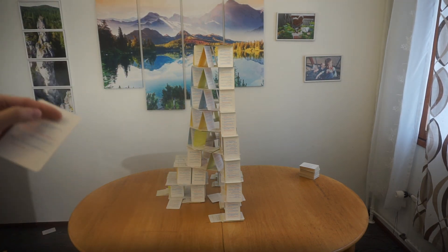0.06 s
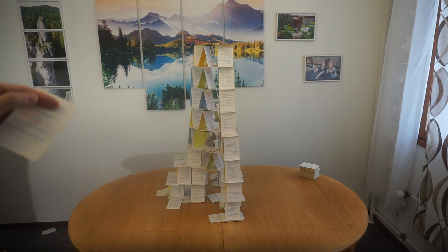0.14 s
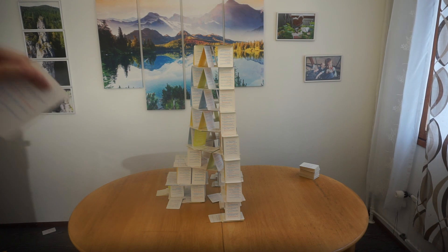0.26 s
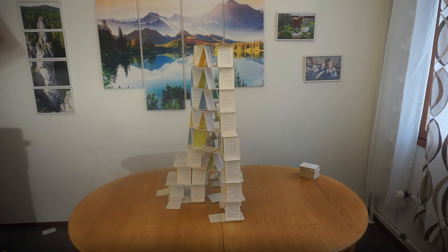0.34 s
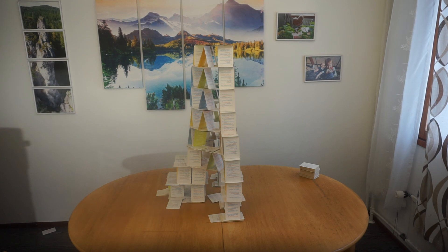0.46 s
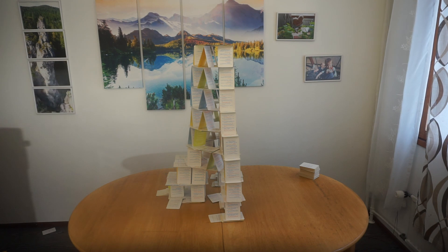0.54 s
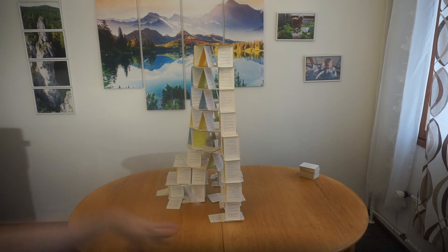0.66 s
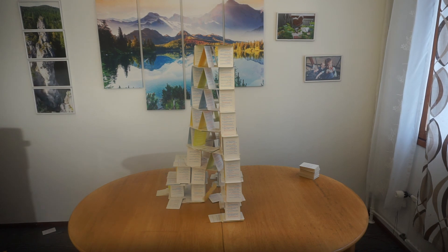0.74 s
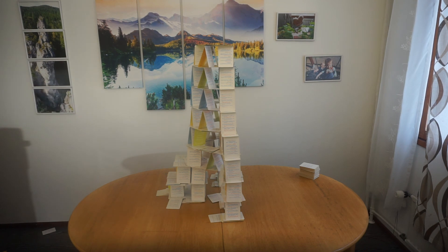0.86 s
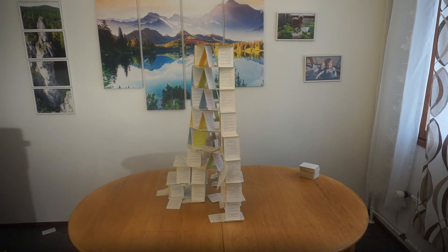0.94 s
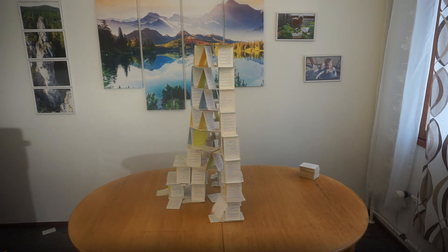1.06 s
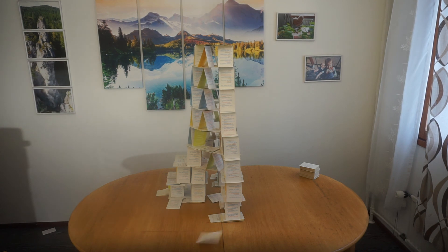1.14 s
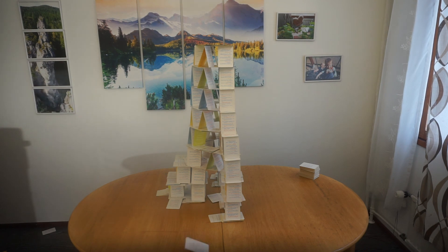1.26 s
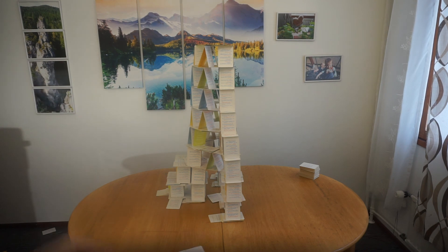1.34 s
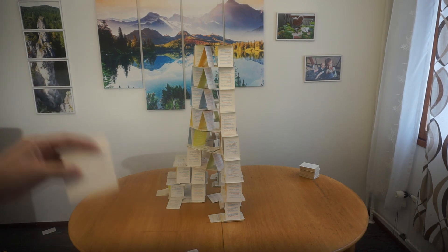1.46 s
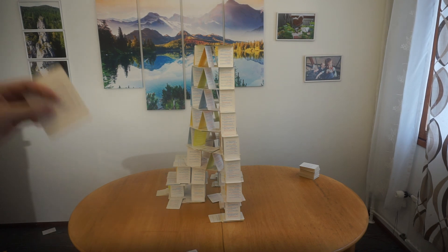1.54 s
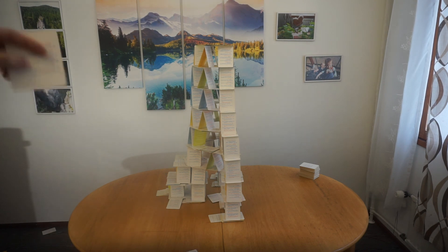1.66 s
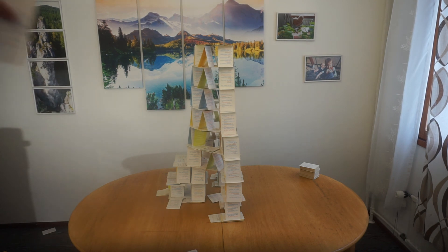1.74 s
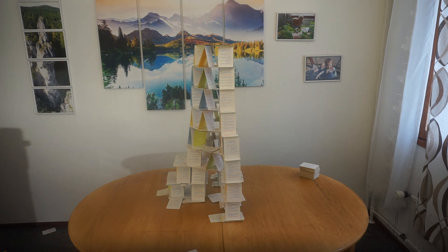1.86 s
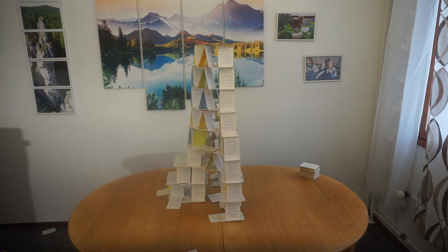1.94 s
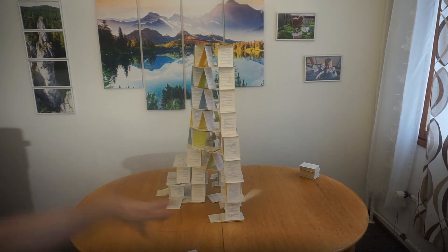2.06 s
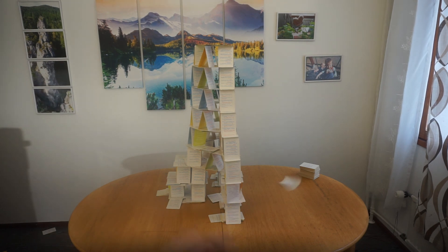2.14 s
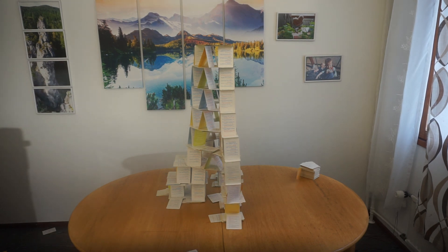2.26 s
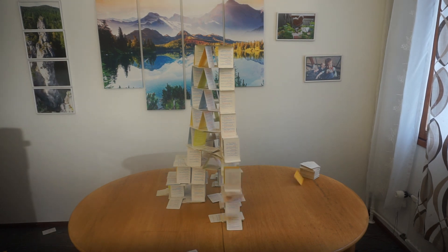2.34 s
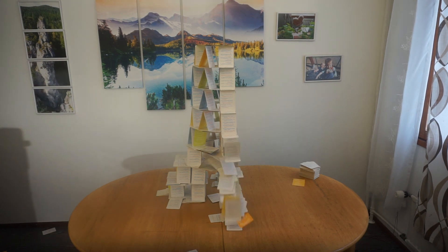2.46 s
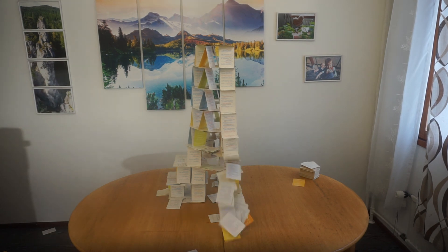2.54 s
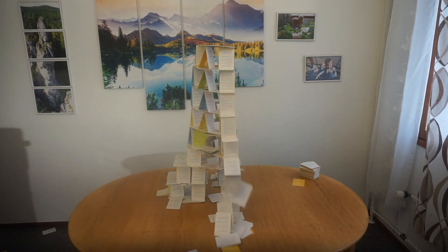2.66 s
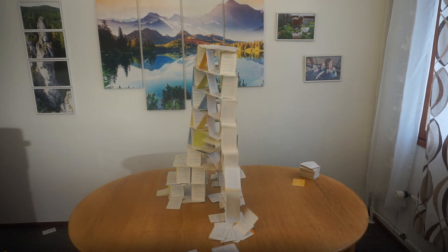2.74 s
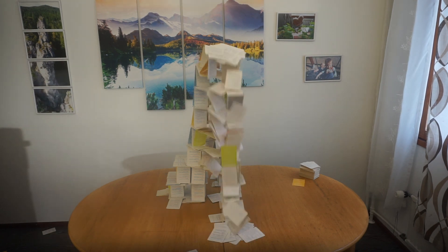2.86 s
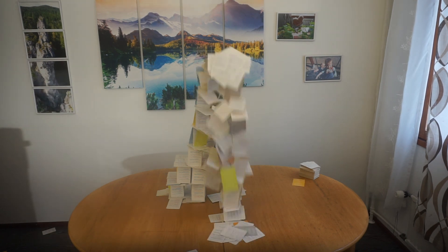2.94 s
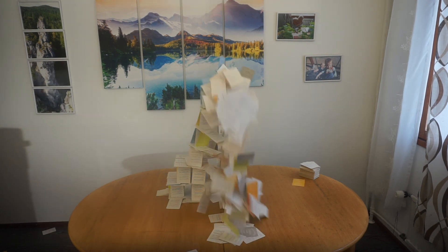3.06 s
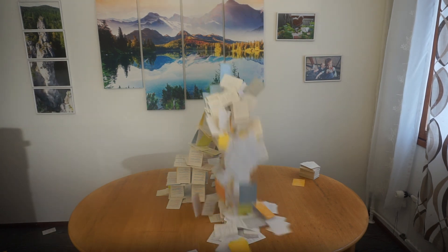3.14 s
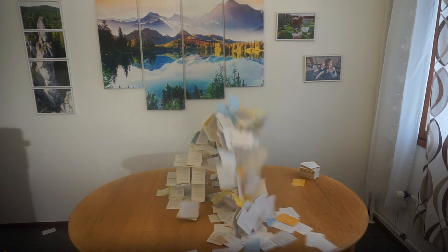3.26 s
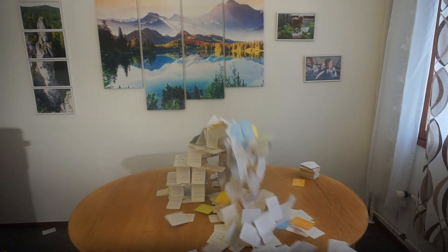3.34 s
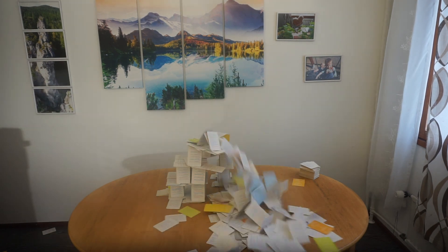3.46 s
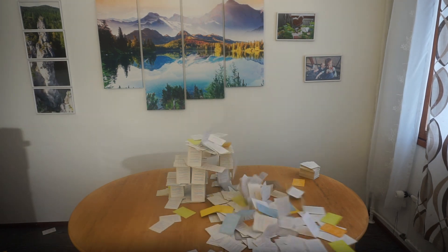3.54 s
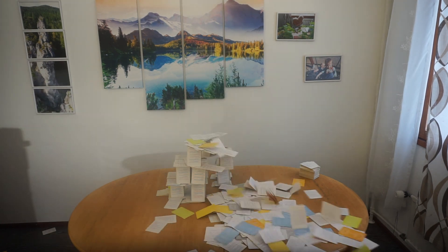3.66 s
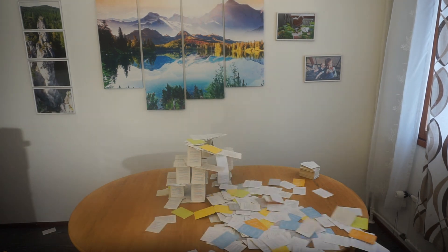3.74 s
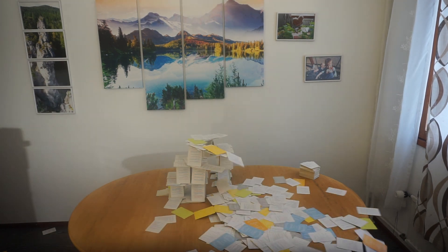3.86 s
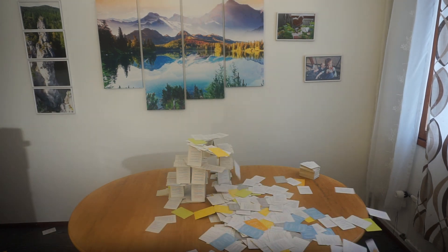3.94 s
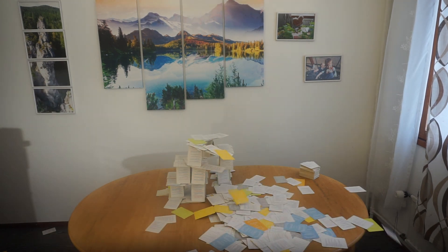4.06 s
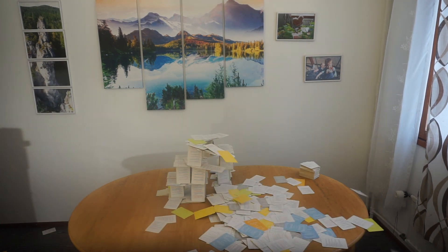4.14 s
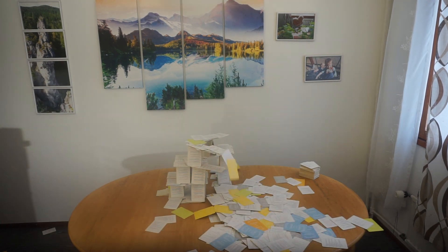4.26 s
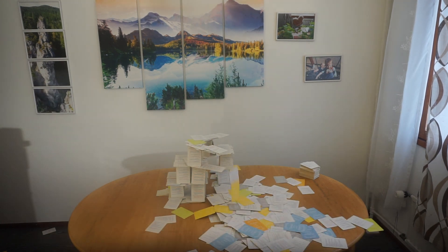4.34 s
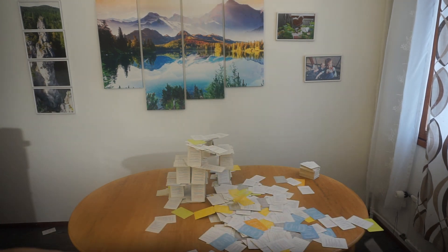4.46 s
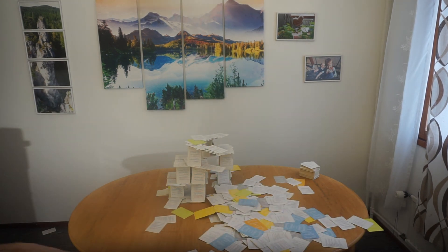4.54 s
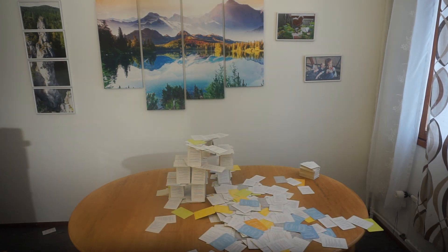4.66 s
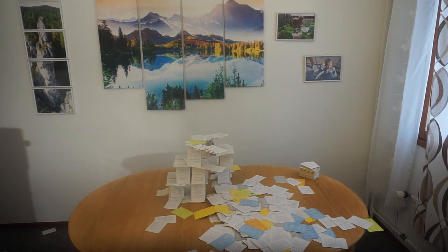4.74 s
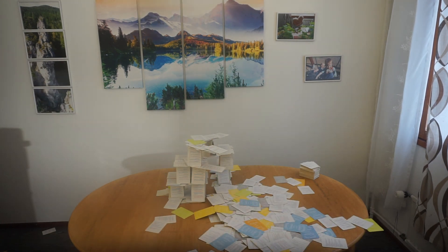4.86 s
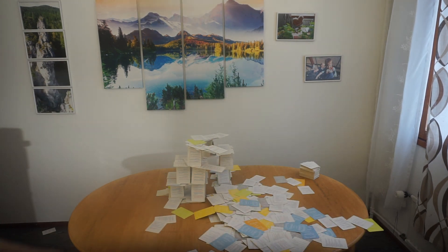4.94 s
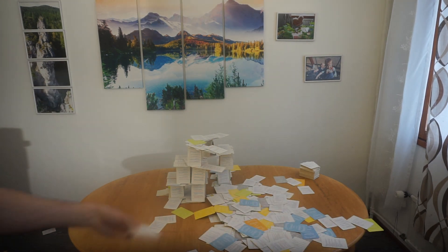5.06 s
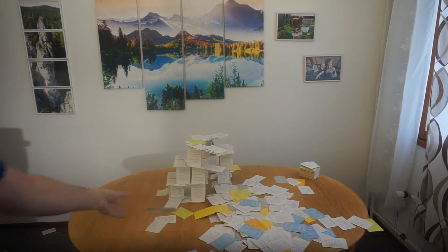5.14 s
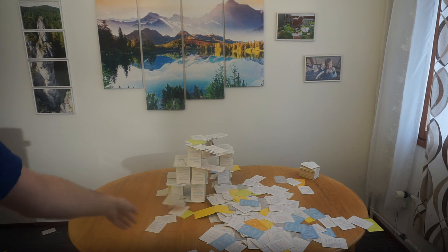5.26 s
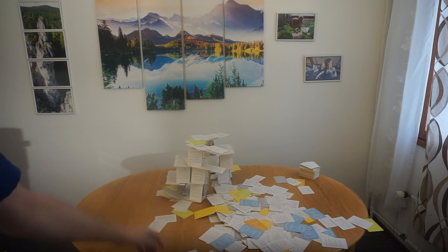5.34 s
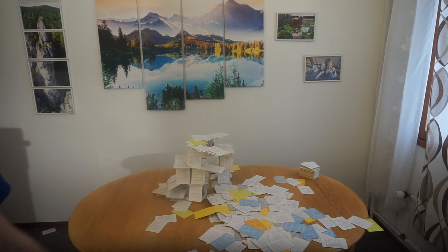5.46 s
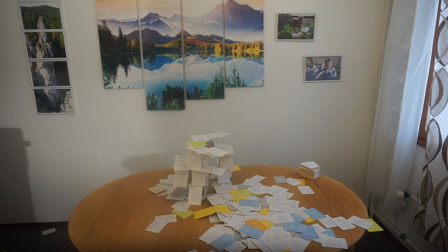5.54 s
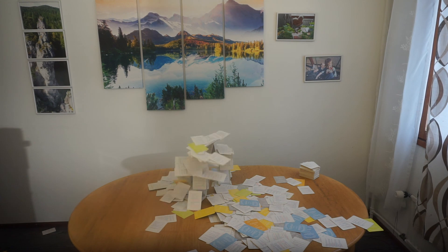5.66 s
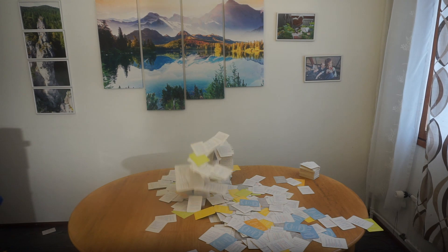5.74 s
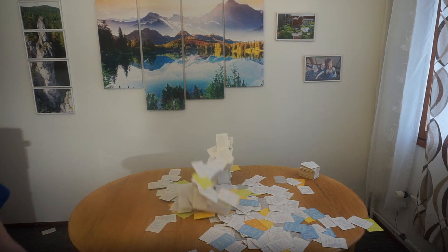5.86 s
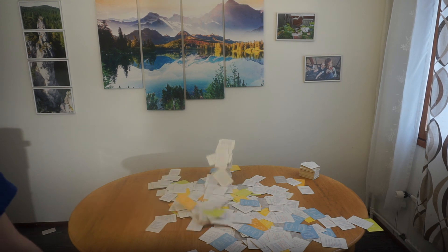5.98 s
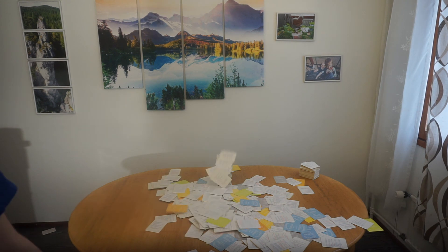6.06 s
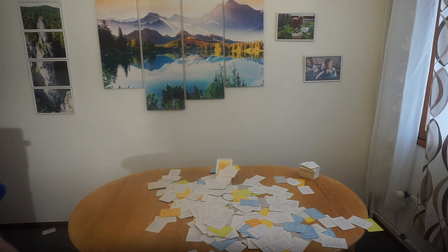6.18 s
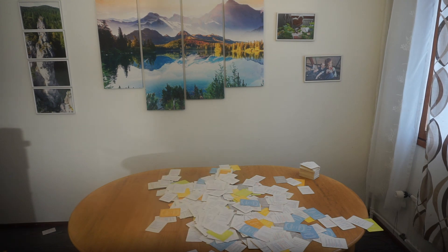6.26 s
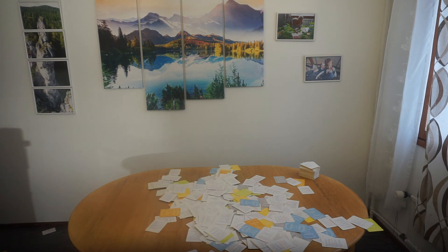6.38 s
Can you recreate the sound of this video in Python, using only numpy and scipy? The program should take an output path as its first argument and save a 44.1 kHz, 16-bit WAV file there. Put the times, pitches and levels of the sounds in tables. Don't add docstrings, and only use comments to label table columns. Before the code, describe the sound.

In a bare, lively room, thrown cards smack hard, a card tower cascades onto table and floor, and a smaller second collapse follows.

```python
import sys
import numpy as np
from scipy import signal
from scipy.fft import rfft, irfft, next_fast_len
from scipy.io import wavfile
from scipy.ndimage import uniform_filter1d, map_coordinates

SR = 44100
rng = np.random.default_rng(int(sys.argv[2]) if len(sys.argv) > 2 else 0)


def bounce(signal):
    frames = np.transpose(np.atleast_2d(signal))
    limited = np.clip(frames, -1, 1)
    pcm = np.round(limited * 32767).astype(np.int16)
    wavfile.write(sys.argv[1], SR, pcm)


def volts(x):
    e = np.asarray(x, float) / 20
    return 10 ** e


N = 282681
TAIL = 24000
GRID_HZ = np.fft.rfftfreq(1024, 1 / SR)

# (time [s], level [dB])
QUIET_LEVEL = [(0, -56), (.55, -57), (1.8, -59.5), (4.8, -66), (5.0, -65), (5.19, -67), (5.22, -69),
               (5.3, -63), (6.41, -54)]
# (frequency [Hz], density [dB per Hz])
HISS_SPECTRUM = [(150, -27), (250, -7.5), (700, -9), (1150, -5.5), (1800, -14), (2400, -9), (3300, -20),
                 (7500, -23), (9300, -21), (11500, -25.5)]
# (frequency [Hz], density [dB per Hz])
RUMBLE_SPECTRUM = [(15, -17), (30, 5), (50, -6), (100, 2.5), (200, -2.5), (400, -15.5)]
# (centre [Hz], width [Hz], level [dB])
WHINE_BANDS = [(838.5, 19, -6.5), (2760, 40, -19)]
# (frequency [Hz], likeness [0-1])
HISS_LIKENESS = [(60, 0.82), (130, 0.29), (270, 0.11), (600, 0.014)]
# (frequency [Hz], likeness [0-1])
ROOM_LIKENESS = [(60, 0.98), (140, 0.97), (350, 0.95), (830, 0.76), (2010, 0.53), (4830, 0.08), (11600, 0)]
# (frequency [Hz], t60 [s])
ROOM_T60 = [(150, 0.77), (400, 0.37), (1000, 0.5), (2800, 0.41), (7300, 0.3), (11000, 0.27)]
# (frequency [Hz], difference [dB])
PORT_TILT = [(60, 1), (170, -0.5), (490, 0.5), (1410, -0.5), (4050, 1.0), (11600, 6)]

# (time [s], level [dB], half length [s])
ARM_SWINGS = [
    (0.626, -44, 0.04),
    (2.04, -49, 0.067),
    (5.5, -57, 0.23),
]
# (time [s], peak [dB], flat thud [dB], ring [Hz])
FINGER_RUBS = [
    (0.607, -31, -8, 4900),
    (0.614, -20.5, -17, 4470),
    (1.548, -49.5, -19, 8240),
    (1.63, -53, -11, 8580),
    (1.7, -51, -14, 8200),
    (2.0024, -31.5, -12.5, 8700),
    (2.037, -43.5, 2, 4570),
    (5.265, -25.5, -11, 3060),
]
# (start [s], length [s], level [dB], flat thud [dB], edge tick [dB])
TABLE_SLIDES = [(0.61, .02, -42, 8, 8), (0.695, 0.074, -13, -5, -13), (1.03, 0.026, -38, -6, -16),
                (1.17, 0.076, -39, -2, 6), (1.3, 0.12, -53.5, -1, 11), (2.095, 0.14, -21.5, -2.5, -3.5),
                (2.3, .17, -35, -3, -8), (2.535, 0.067, -23, -6, 7), (2.62, 0.15, -22.5, -4.5, 0.5),
                (2.79, 0.22, -21, -6.5, 2.5), (2.96, 0.16, -16.5, -5.5, 0.5), (3.099, 0.17, -16, -5, 0.5),
                (3.25, 0.25, -17, -4.5, 1.5), (3.47, 0.18, -21.5, -3.5, 3.5), (3.7, 0.19, -24, -6, 1),
                (3.95, 0.33, -25.5, -1.5, 4), (5.302, 0.11, -30, 0, -1.5), (5.428, 0.23, -29, -8, -1.5),
                (5.667, 0.093, -32.5, -0.5, 4.5), (5.76, .12, -27.5, -2.5, 2),
                (5.878, 0.16, -18, -6.5, 0.5), (6.063, 0.14, -24.5, -8, -1.5),
                (6.177, 0.068, -23, -9.5, -3.5)]
# (start [s], length [s], level [dB], flat thud [dB], edge tick [dB])
FLOOR_SLIDES = [
    (4.15, .05, -24.5, -21, 8),
    (4.19, 0.13, -18, -11.5, 3),
    (4.35, 0.12, -25, -2, 0),
    (4.49, .06, -32, -6, -4),
    (4.595, 0.028, -35, 7, 2.5),
    (4.75, 0.05, -44, 15.5, -1.5),
]
# (time [s], peak [dB], flat thud [dB], ring [Hz])
TABLE_SLAPS = [(0.6905, -6, -15.5, 2500), (1.033, -35, -9.5, 1210), (1.384, -37.5, -23, 2610),
               (2.0897, -6.5, -25, 2220), (2.312, -42, -25, 2340), (2.38, -22, -20, 2430),
               (2.5282, -8.5, -21.5, 1800), (5.2787, -14.5, -11, 2760), (5.4264, -28, -19, 2310),
               (5.6704, -17, -26, 1900), (5.781, -15.5, -8.5, 1510), (6.088, -26, -16, 2320)]
# (time [s], peak [dB], flat thud [dB], ring [Hz])
EDGE_FLICKS = [(1.065, -50, -20, 6000), (1.4641, -42.5, -7, 8000), (1.524, -39.5, -6.5, 2000),
               (1.9144, -55, 0, 5200), (2.0067, -41, -6, 4820), (2.299, -31, -20, 7600),
               (3.6725, -10.5, -25, 3800), (3.6754, -14.5, -18, 3780), (4.398, -12.5, -16, 4150),
               (4.438, -18.5, -25, 4250), (5.864, -12.5, -19, 4530), (6.001, -18, -26, 3840),
               (6.02, -12, -16, 3040)]
# (time [s], peak [dB], flat thud [dB], ring [Hz])
CARTON_BOUNCES = [
    (1.1634, -20.5, -14.5, 1160),
    (1.204, -21.5, -17.5, 2140),
    (1.231, -35, -19, 1660),
    (1.299, -28, -32, 2020),
    (1.3416, -45, -16, 2020),
]
# (time [s], peak [dB], flat thud [dB], ring [Hz])
CARD_TUMBLES = [(2.471, -24, -13, 2150), (2.5694, -18, -33, 2010), (2.8, -10.5, -17, 2780),
                (2.8265, -20.5, -35, 2840), (2.969, -10.5, -13.5, 1650), (3.0437, -11.5, -18, 2780),
                (3.1673, -9.5, -11.5, 1680), (3.2555, -10.5, -39, 2700), (3.3482, -12.5, -11.5, 956),
                (3.418, -10, -11.5, 1150), (3.4694, -11.5, -19.5, 2450), (3.528, -9.5, -13, 1960),
                (3.591, -27, -16, 3000), (3.7776, -16, -19, 2600), (3.837, -14, -19.5, 2750),
                (3.8955, -23.5, -1, 2340), (3.932, -16, -14, 1540), (3.957, -10.5, -17.5, 1720),
                (4.0494, -20.5, -16.5, 1340), (4.503, -23.5, -31, 4000), (5.5525, -28.5, -8.5, 2660),
                (5.838, -15.5, -28, 2390), (5.9384, -18.5, -14, 1250), (5.9762, -12, -24, 1160),
                (6.1923, -19, -21, 2000)]
# (time [s], peak [dB], flat thud [dB], ring [Hz])
FLOOR_SLAPS = [(4.185, -9.5, -6, 552), (4.2357, -8, -25.5, 700), (4.3552, -17.5, -6.5, 730),
               (4.398, -23.5, -19, 765), (4.442, -27, -33, 899), (4.4986, -17, -17.5, 524),
               (4.593, -20.5, -3, 606), (4.6194, -39, -2, 503), (4.7472, -26.5, -8, 652),
               (4.775, -31.5, -16, 610), (4.8324, -38, -11, 640)]

# (frequency [Hz], level [dB])
THUD_SPECTRUM = [(150, -38), (280, -3), (420, 2), (600, 1.5), (900, 4), (1400, 0), (2500, -44.5)]
# (frequency [Hz], level [dB])
BOARDS_SPECTRUM = [(200, -36), (350, -12), (480, -3.5), (650, 0), (850, -4.5), (1100, -3), (2000, -37.5)]
# (frequency [Hz], level [dB])
BODY_SPECTRUM = [(400, -27.5), (800, -11.5), (1300, -5), (2300, -2), (3200, -4.5), (4500, -7.5),
                 (7000, -26.5)]
# (frequency [Hz], level [dB])
TICK_SPECTRUM = [(2500, -30), (4000, -5), (5500, -3.5), (7000, -4), (8500, -4), (10000, -6), (12000, -12.5)]
# (frequency [Hz], level [dB])
BOOM_SPECTRUM = [(40, -34), (110, -25), (160, -2), (215, 6), (300, -1), (500, -47)]
# (centre [Hz], width [Hz], level [dB])
HOLLOW_MODES = [(800, 69, 1.5), (1230, 28, 1), (1690, 70, -7), (2020, 39, 0), (2550, 34, 4),
                (3050, 89, -13)]

WHINE_FOLLOWS = .25
SOFT_EDGE, EDGE_KNEE_DB = 0.12, -16
FLAT_BOOM, FLAT_KNEE_DB = .6, -18
DUCK_KNEE_DB, HOLD_S_PER_DB = -11, -0.03
SLIDE_RISE_S, SLIDE_SAG_DB_PER_S, SLIDE_FALL_DB_PER_S = 0.015, 15.5, 401
SLIDE_BOOM_DB, TICK_SAG_DB_PER_S = -19, 15


def unit(x):
    return x / np.sqrt(np.mean(x ** 2) + 1e-20)


def along(points, hz):
    f, v = np.transpose(points)
    return np.interp(np.log(hz + 1), np.log(f + 1), v)


def filtered(x, response):
    n = x.shape[-1]
    m = next_fast_len(n + 4096)
    return irfft(rfft(x, m) * response(np.fft.rfftfreq(m, 1 / SR)), m)[..., :n]


def pair(two, likeness):
    def mid_side_gains(hz):
        turn = np.arccos(np.clip(along(likeness, hz), -1, 1)) / 2
        return np.array([np.cos(turn), np.sin(turn)])
    mid, side = filtered(two, mid_side_gains)
    return np.array([mid + side, mid - side])


def stereo_noise(likeness):
    return pair(rng.standard_normal((2, N)), likeness)


def quiet():
    s, db = np.transpose(QUIET_LEVEL)
    level_db = np.interp(np.arange(N) / SR, s, db)

    def bed(spectrum):
        return unit(filtered(stereo_noise(HISS_LIKENESS), lambda hz: volts(along(spectrum, hz))))
    out = volts(level_db) * (bed(HISS_SPECTRUM) + bed(RUMBLE_SPECTRUM))
    whine_db = level_db[0] + WHINE_FOLLOWS * (level_db - level_db[0])
    for centre_hz, width_hz, db in WHINE_BANDS:
        band = lambda hz: np.exp(-((hz - centre_hz) / width_hz) ** 2)
        out += volts(whine_db + db) * unit(filtered(stereo_noise(ROOM_LIKENESS), band))
    return out


def swings():
    t = np.arange(N) / SR
    push = sum(volts(db) * np.exp(-((t - s) / half_s) ** 2) for s, db, half_s in ARM_SWINGS)
    puff = lambda hz: volts(along([(15, -32), (35, -9), (90, -8.5), (250, -36)], hz))
    return push * unit(filtered(stereo_noise([(50, 1.0)]), puff))


def colour(spectrum):
    return unit(volts(along(spectrum, GRID_HZ)))


def contact(gain):
    cepstrum = irfft(np.log(gain))
    cepstrum[1:512] *= 2
    cepstrum[513:] = 0
    return irfft(np.exp(rfft(cepstrum)))[:512]


def room(hold_s):
    hz, t, z = signal.stft(rng.standard_normal((2, TAIL)), SR, nperseg=256)
    fall = np.maximum(t - abs(hold_s), 0) / along(ROOM_T60, hz)[:, None]
    noise = signal.istft(z * volts(-60 * fall), SR, nperseg=256)[1][:, :TAIL]
    tail = pair(noise, ROOM_LIKENESS)
    return tail / np.linalg.norm(tail[0])


def contacts(table, edge_db, hold_s, wet_db, boom_db, ring_db, width_hz, rise_s, pan_db, t60_s,
             face=THUD_SPECTRUM):
    gap = round(.004 * SR)
    out = np.zeros((2, N + 2 * TAIL))
    t = np.arange(700) / SR
    colours = [colour(s) for s in (face, BODY_SPECTRUM, TICK_SPECTRUM, BOOM_SPECTRUM)]
    envelope = volts(-60 * t / t60_s) * (1 - np.exp(-3.5 * t / rise_s))
    pan = volts(12.0 + np.array([[pan_db / 2], [-pan_db / 2]]))
    for s, db, thud_db, ring_hz in table:
        tick_db = edge_db + SOFT_EDGE * (EDGE_KNEE_DB - db)
        table_db = boom_db + FLAT_BOOM * (thud_db - FLAT_KNEE_DB)
        ring_level_db = ring_db + (thud_db if ring_hz < 1000 else 0)
        ring = colour([(ring_hz - 3 * width_hz, -40), (ring_hz, 0), (ring_hz + 3 * width_hz, -40)])
        levels_db = np.array([thud_db + 7, 0, tick_db + 7.5, table_db, ring_level_db])
        parts = np.array(colours + [ring]) * volts(db + levels_db[:, None])
        answer = contact(np.linalg.norm(parts, axis=0))

        burst = rng.standard_normal(len(t)) * envelope
        blow = signal.fftconvolve(burst / np.linalg.norm(burst), answer)
        start = round(s * SR)
        out[:, start:start + len(blow)] += blow * pan

        hold = hold_s + HOLD_S_PER_DB * max(db - DUCK_KNEE_DB, 0)
        echo = volts(wet_db) * signal.fftconvolve(answer[None], room(hold), axes=1)
        echo *= 1 - np.exp(-np.arange(echo.shape[1]) / SR / rise_s)
        start += gap
        out[:, start:start + echo.shape[1]] += echo
    return out[:, :N]


def rubs():
    return contacts(FINGER_RUBS, edge_db=-3.5, hold_s=0.0081, wet_db=17.5, boom_db=-12, ring_db=-3.0,
                    width_hz=750, rise_s=0.0053, pan_db=8.5, t60_s=0.065)


def slides(table):
    t = np.arange(0, N / SR + .002, .001)
    start, length, db, thud_db, tick_db = np.transpose(table)[:, :, None]
    age = t - start
    sag_db = SLIDE_SAG_DB_PER_S * np.maximum(age, 0)
    stop_db = SLIDE_FALL_DB_PER_S * np.maximum(age - length, 0)
    body = volts(db - sag_db - stop_db) * np.clip(age / SLIDE_RISE_S, 0, 1)
    thud = body * volts(thud_db)
    tick = body * volts(tick_db - TICK_SAG_DB_PER_S * np.maximum(age, 0))
    return [np.interp(np.arange(N) / SR, t, np.linalg.norm(part, axis=0)) for part in (body, thud, tick)]


def heap():
    contacts_per_s, scatter_db, most_db, patchy_db, flutter_db = 1600, 4.5, 16, 3.0, 2.0
    body, thud, tick = slides(TABLE_SLIDES)
    spill, knock, scrape = slides(FLOOR_SLIDES)
    size_db = np.minimum(scatter_db * rng.exponential(size=N), most_db)
    sizes = volts(size_db) * (rng.random(N) < contacts_per_s / SR)
    flutter = map_coordinates(rng.standard_normal(200), [np.linspace(0, 199, N)])
    clumps = uniform_filter1d(sizes, 24) * volts(flutter_db * flutter)

    layers = [(THUD_SPECTRUM, thud), (BOARDS_SPECTRUM, knock), (BODY_SPECTRUM, np.hypot(body, spill)),
              (TICK_SPECTRUM, np.hypot(tick, scrape)), (BOOM_SPECTRUM, body * volts(SLIDE_BOOM_DB))]
    dry = 0
    for spectrum, level in layers:
        grains = clumps * rng.standard_normal(N)
        dry = dry + volts(-6) * level * unit(signal.oaconvolve(grains, contact(colour(spectrum)))[:N])

    z = signal.stft(dry, nperseg=256)[2]
    field = uniform_filter1d(rng.standard_normal(z.shape), size=3, axis=0)
    field = unit(uniform_filter1d(field, size=20, axis=1))
    low = np.linspace(1, 0, len(z))[:, None] ** 2
    dry = signal.istft(z * volts(patchy_db * field * low), nperseg=256)[1][:N]

    wet, step = np.zeros((2, N + 2 * TAIL)), 13000
    for start in range(0, N, step):
        piece = np.pad(dry[start:start + step], (200, 0))
        echo = signal.fftconvolve(piece[None], room(0.0058), axes=1)
        wet[:, start:start + echo.shape[1]] += echo
    return volts(-5) * dry + volts(-2) * wet[:, :N]


def slaps():
    return contacts(TABLE_SLAPS, edge_db=-10, hold_s=0.029, wet_db=24, boom_db=-26.5, ring_db=-9.5,
                    width_hz=200, rise_s=0.00043, pan_db=2.5, t60_s=0.022)


def flicks():
    return contacts(EDGE_FLICKS, edge_db=-7, hold_s=.005, wet_db=15.5, boom_db=-19, ring_db=-1.5,
                    width_hz=430, rise_s=0.00071, pan_db=6, t60_s=0.016)


def bounces():
    plain = contacts(CARTON_BOUNCES, edge_db=-11, hold_s=0.015, wet_db=24, boom_db=-23, ring_db=-8.5,
                     width_hz=150, rise_s=0.00086, pan_db=3.0, t60_s=0.024)

    def mode(f, hz, width_hz, db):
        damping = 1j * f * width_hz
        return volts(db) * damping / (hz * hz - f * f + damping)
    return filtered(plain, lambda f: volts(-7) + sum(mode(f, *row) for row in HOLLOW_MODES))


def tumbles():
    return contacts(CARD_TUMBLES, edge_db=-7.0, hold_s=0.013, wet_db=25, boom_db=-28.5, ring_db=-6.5,
                    width_hz=230, rise_s=0.0021, pan_db=-2.5, t60_s=0.057)


def floor_slaps():
    return contacts(FLOOR_SLAPS, edge_db=-19, hold_s=0.0067, wet_db=23.0, boom_db=-36.5, ring_db=4.5,
                    width_hz=88, rise_s=0.0014, pan_db=-5.5, t60_s=0.038, face=BOARDS_SPECTRUM)


def scene():
    cards = rubs() + heap() + slaps() + flicks() + bounces() + tumbles() + floor_slaps()
    light = lambda hz: volts(along([(30, -32.0), (70, -4.0), (130, -1)], hz))
    return quiet() + swings() + filtered(cards, light)


def low_pass(x):
    return signal.sosfilt(signal.butter(12, 12220, fs=SR, output="sos"), x)


def record(dry):
    top_hz = 11162

    def response(hz):
        ports = volts(along(PORT_TILT, hz) * [[.5], [-.5]])
        edge_db = np.interp(hz - top_hz, [-200, 5, 155.5, 1202.5, 5000], [-1, -22.5, -51.5, -54.0, -75])
        return ports * volts(edge_db)
    rounded = dry / (1 + np.abs(dry / .75) ** 4) ** (1 / 4)
    return low_pass(filtered(rounded, response))


dry = scene()
out = record(dry)
bounce(out)
```